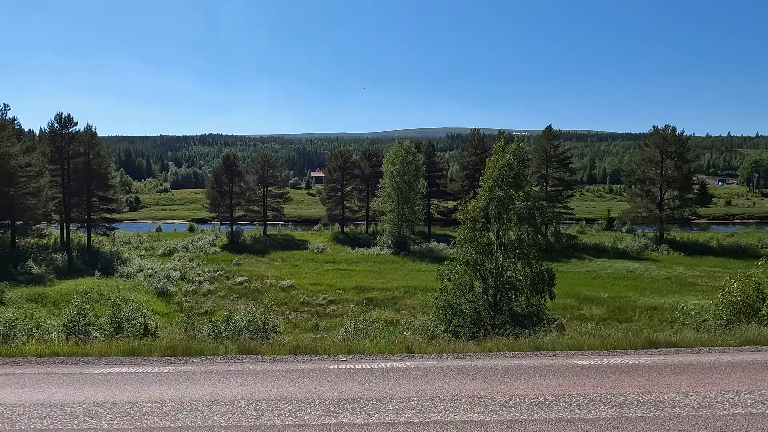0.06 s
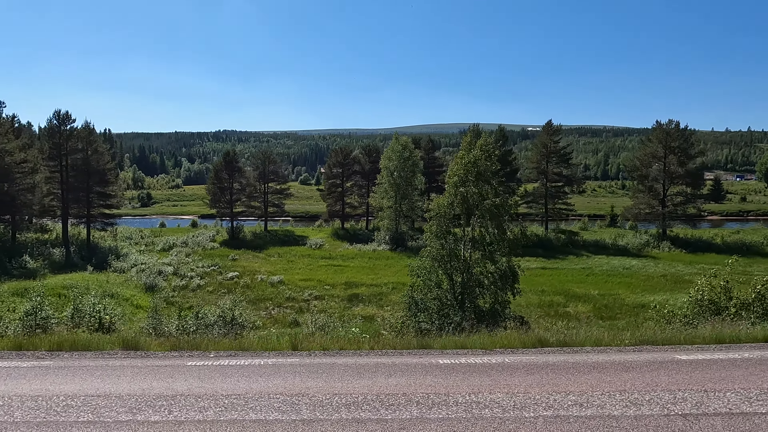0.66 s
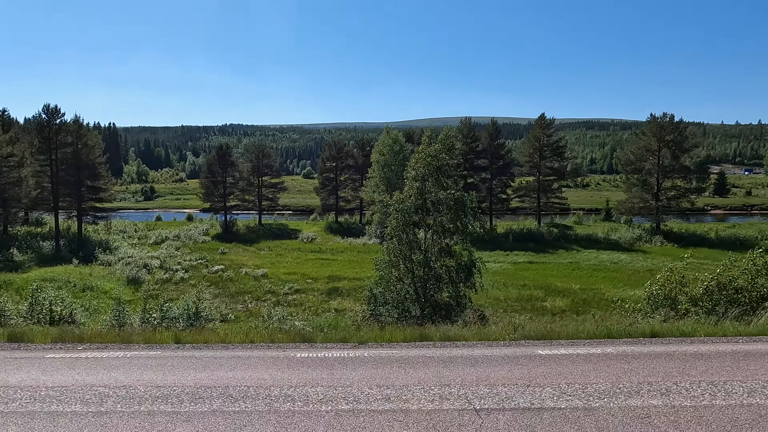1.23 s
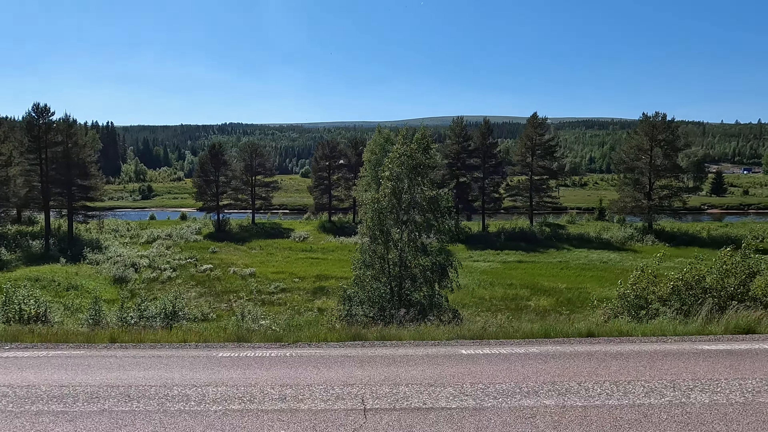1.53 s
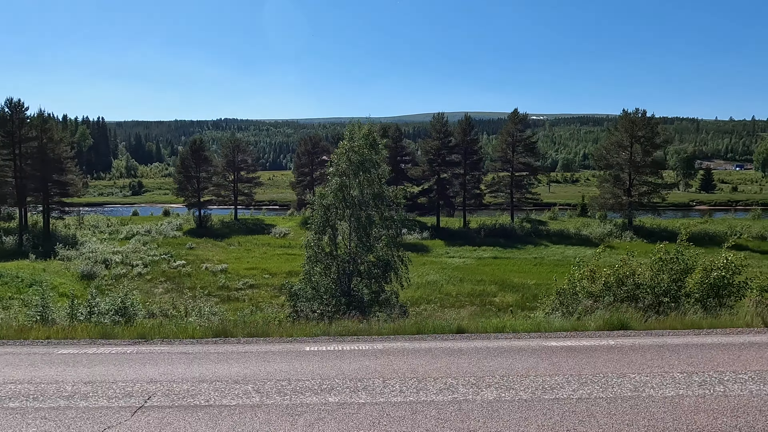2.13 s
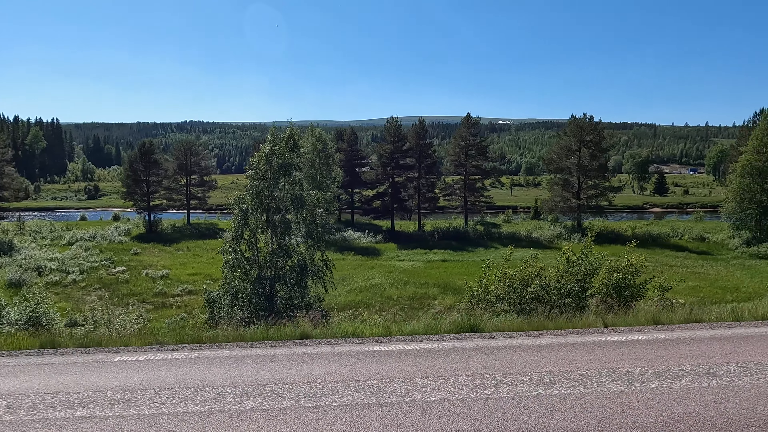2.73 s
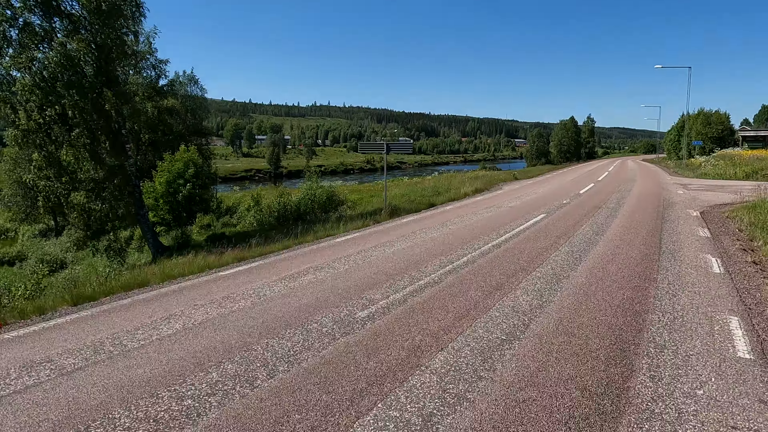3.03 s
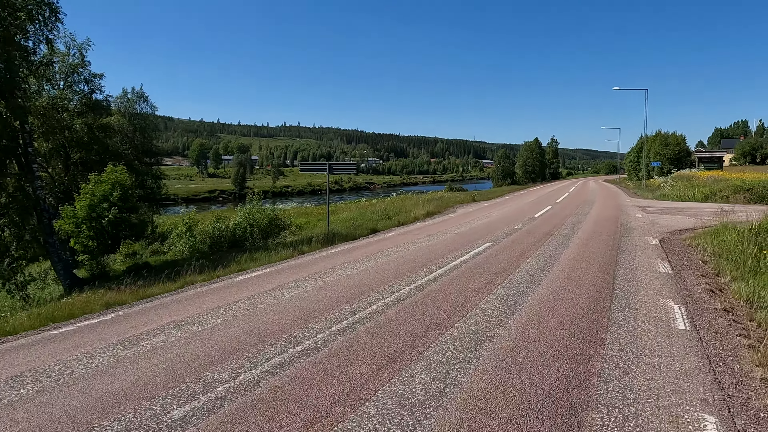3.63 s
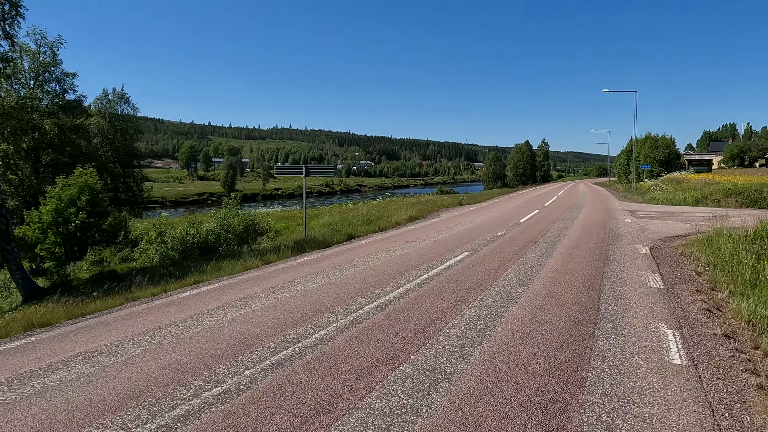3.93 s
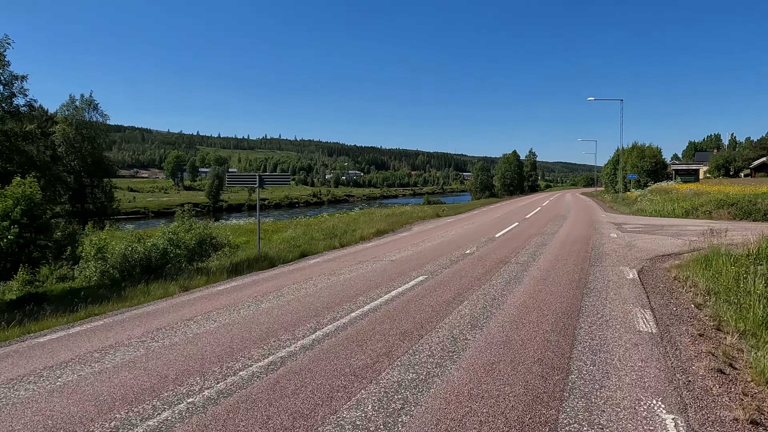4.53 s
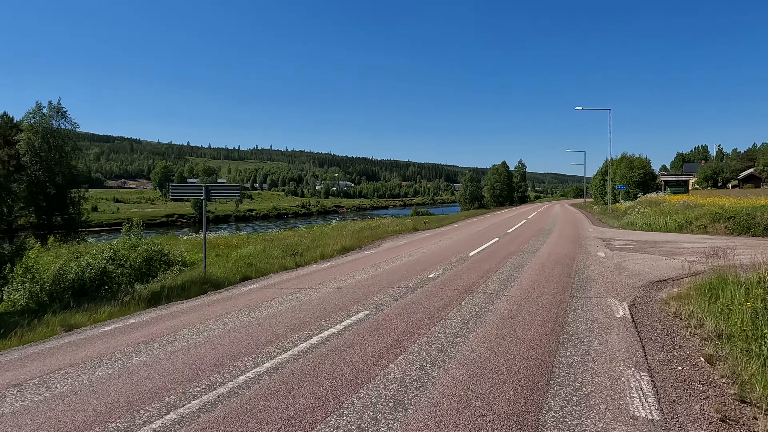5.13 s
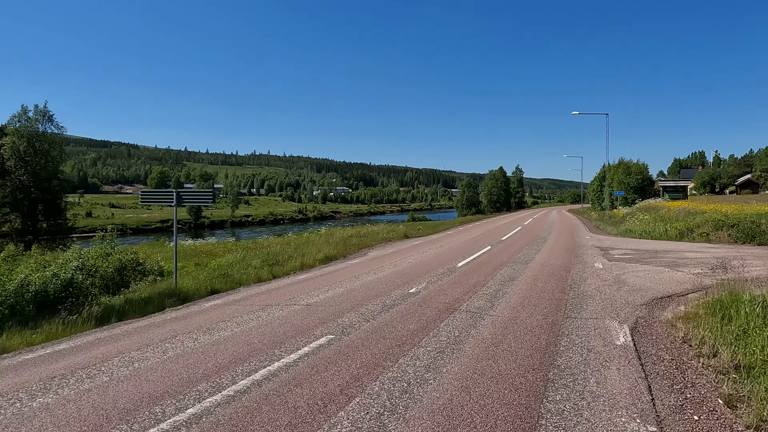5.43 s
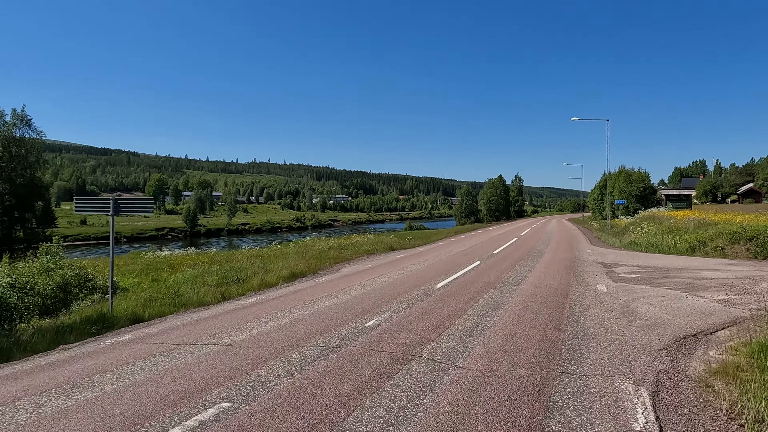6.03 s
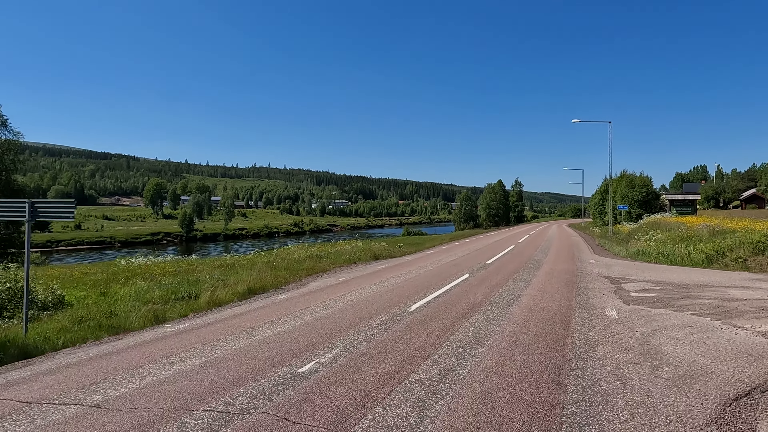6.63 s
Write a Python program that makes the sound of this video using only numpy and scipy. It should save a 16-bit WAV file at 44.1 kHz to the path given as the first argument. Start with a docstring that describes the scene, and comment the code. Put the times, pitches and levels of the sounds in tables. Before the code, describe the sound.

Beside a country road, a warbler whistles and trills while dry grass rustles and snaps, and a distant engine drone fades in. After about three seconds the sound cuts to a motorcycle close by, which revs, shifts up a gear and pulls away steadily over rushing tyres, hissing air and small ticks of grit. Gusts of wind bump the microphone with a low rumble throughout.

```python
"""A warbler whistles by a country road, grass rustles and an engine drones far off.
After three seconds the scene cuts to a motorcycle close by, which shifts up a gear and pulls away.
Its four cylinders fire into a ringing exhaust pipe, over the rush of tyres and air and ticks of grit.
All along, gusts of wind bump the microphone with a low rumble."""
import sys
import numpy as np
from scipy import signal
from scipy.fft import rfft, irfft
from scipy.io import wavfile
from scipy.ndimage import uniform_filter1d

SR = 44100
rng = np.random.default_rng(int(sys.argv[2]) if len(sys.argv) > 2 else 0)


def master_out(mix):
    """Clip the mix to full scale and print it as 16-bit PCM to the path in sys.argv[1]."""
    frames = np.transpose(np.atleast_2d(mix))
    ceiling = np.clip(frames, -1, 1)
    pcm = np.round(ceiling * 32767).astype(np.int16)
    wavfile.write(sys.argv[1], SR, pcm)


N = 302827
T = np.arange(N) / SR
CUT_S = 3.0633  # the roadside ends and the ride begins
SHIFT_S, BITE_S = 3.32, 3.75  # the throttle closes, then the clutch bites in the higher gear

# how far left the ride sounds: f/Hz, left minus right/dB
RIDE_PAN = [(110, 0), (200, 2), (380, 4.5), (700, 10), (1290, 16), (2380, 8), (4400, -0.5), (15000, 14.5)]
# how much earlier the ride reaches the left side: f/Hz, phase lead/rad
RIDE_LEAD = [(150, 0), (450, 0.35), (600, 1.1), (720, 3.2), (1100, 3.6), (2000, 3.2), (3100, 4.2),
             (3500, 1.6), (9000, 0.3)]
# how alike the two sides sound at the roadside: f/Hz, likeness (1 = the same)
ROADSIDE_LIKENESS = [(1400, 0.99), (3100, 0.85), (7000, 1), (15000, 0.065)]
# how far left the roadside sounds: f/Hz, left minus right/dB
ROADSIDE_PAN = [(400, 0.5), (2400, 2.5), (4400, -1), (8000, 4.5), (15000, 7)]


def motorcycle(puff=0.33, clatter=0.11):
    """The exhaust note and its rasp of gas, with tyres, machinery and air; firings puff and clatter."""
    # how hard the engine works: t/s, level/dB
    effort = [(3.1, -32), (3.58, -29), (3.74, -35.5), (4.7, -30.8), (4.95, -31.8), (5.12, -33.3),
              (6.0, -33.5), (6.1, -35.5), (6.75, -41)]
    # tone of the rushing exhaust gas: f/Hz, level/dB
    gas_tone = [(30, -17), (80, -4), (200, 0), (330, -5), (450, -6.5), (610, -8), (730, -10.5), (1000, -22)]
    effort_db, = curves(effort)
    cycle_hz = engine_speed()
    cycles = 0.168 + np.cumsum(cycle_hz * (T > CUT_S)) / SR
    firing = np.cos(2 * np.pi * 4 * cycles)  # four firings a cycle
    note = exhaust(cycle_hz, cycles, push_db=effort_db + 31.5)  # effort above a steady pull
    gas_db = effort_db + by_gear(low_db=0, high_db=2, arch_db=2, db_per_s=-0.7)
    gas = gain_of(gas_db) * (1 + puff * firing) * ride_rush(gas_tone, patchy_db=2.5)
    return note + gas + tyres() + (1 + clatter * firing) * machinery() + air_hiss()


def exhaust(cycle_hz, cycles, push_db, shake=0.04, smear=0.39, stagger=2.85):
    """Firings give every fourth harmonic, tones between add a throb; the pipe colours and delays them."""
    # the tones: multiple of the cycle rate, low-gear level/dB, high-gear level/dB
    tones = [(1, -1.5, -6.0), (2, 4.1, -7.5), (3, 4.5, -8.0), (4, 13.6, 7.5), (5, 5.2, 11.7),
             (6, -5.0, 3.6), (7, -4.5, -6.0), (8, 5.0, 9.3), (9, 6.2, -0.5), (10, 1.3, -1.5),
             (11, 1.0, 0.0), (12, -4.0, 1.0), (13, 2.4, -1.8), (14, -4.3, -2.5), (15, 2.9, -2.6),
             (16, -8.5, -11.2), (17, -7.2, -4.5), (18, 0.4, -9.5), (19, 6.7, -7.5), (20, 1.7, 2.0),
             (21, -1.1, 3.6), (22, -2.9, 2.3)]
    # what the pipe and silencer let through: f/Hz, level/dB
    pipe = [(30, -14.6), (80, -5.4), (105, -3.1), (120, -6.3), (135, -10.4), (150, -11.3), (165, -9.3),
            (180, -3.8), (210, -11.5), (230, -9.7), (250, -8.8), (275, -11.3), (300, -15.2), (325, -10.6),
            (350, -11.9), (375, -17.1), (410, -16.0), (450, -15.5), (490, -14.9), (530, -18.3),
            (620, -22.3), (700, -36.6), (950, -35.0)]
    firing_db = by_gear(low_db=-24, high_db=-24, arch_db=6, db_per_s=0)
    throb_db = by_gear(low_db=-24, high_db=-24, arch_db=-2.5, db_per_s=-0.15)
    engaged = shift_progress() ** 3  # the high gear takes hold late in the change
    grid_hz = np.fft.rfftfreq(8192, 1 / SR)
    log_gain = np.log(gain_of(read(pipe, grid_hz)))
    # the pipe's delay at each frequency follows from its gains
    pipe_lag = -signal.hilbert(np.r_[log_gain, log_gain[-2:0:-1]]).imag[:len(grid_hz)]
    out = np.zeros((2, N))
    for k, low_db, high_db in tones:
        hz = k * cycle_hz
        upper = np.clip((hz - 250) / 250, 0, 1)
        level_db = low_db + (high_db - low_db) * engaged + (throb_db if k % 4 else firing_db)
        level_db += read(pipe, hz)
        level_db += 0.9 * upper * push_db  # an open throttle sharpens the pulses
        level_db += (0.7 + 1.8 * upper) * waver(hz=2.0)  # upper harmonics waver more
        # a separate drone just below the fifth harmonic beats with the note, so the throb slowly changes
        multiple = k - 0.01 * (k == 5)
        phase = 2 * np.pi * multiple * cycles + np.interp(hz, grid_hz, pipe_lag)
        phase += smear * k ** 2  # the silencer's chambers spread each pulse
        phase += stagger * (k % 2)  # shifts the odd tones against the even ones
        pair = np.cos([phase, phase - read(RIDE_LEAD, hz)])
        out += np.sqrt(2) * gain_of(level_db) * pair * sides(read(RIDE_PAN, hz))
    return out * (1 + shake * waver(hz=61.4))  # no two firings are equally strong


def engine_speed(top_hz=40.6, bite_hz=27.92, low_hz_per_s=7.4, high_hz_per_s=2.27):
    """Four-stroke cycles a second: they climb, fall while the clutch is out, then climb more slowly."""
    fall = (bite_hz - top_hz) * shift_progress() ** 1.65
    climb = low_hz_per_s * np.minimum(T - SHIFT_S, 0) + high_hz_per_s * np.maximum(T - BITE_S, 0)
    return top_hz + fall + climb


def shift_progress():
    """How far the gear change has got, from 0 in the low gear to 1 in the high one."""
    return np.clip((T - SHIFT_S) / (BITE_S - SHIFT_S), 0, 1)


def by_gear(low_db, high_db, arch_db, db_per_s):
    """A level that moves from low gear to high, with a hump or dip on the way and a drift afterwards."""
    progress = shift_progress()
    arch = arch_db * np.sin(np.pi * progress) ** 2
    return low_db + (high_db - low_db) * progress + arch + db_per_s * np.maximum(T - BITE_S, 0)


def tyres():
    """The tread hums at a drifting pitch and rings faintly about an octave up; the road roars under it."""
    # tones of the tread's hum, its higher ring and the road's roar: f/Hz, level/dB
    hum_tone = [(600, -28.5), (820, -20), (915, 2), (1030, -1.5), (1170, -10), (1700, -26.5)]
    ring_tone = [(1600, -26.5), (1930, 0.5), (2200, -20), (3500, -49.5)]
    roar_tone = [(500, -18), (780, -1), (1000, -3.5), (1420, -4), (1680, -8.5), (2100, -21), (3000, -40)]
    # drift of the hum: t/s, ratio to its usual pitch
    hum_pitch = [(3.1, 1.025), (4.5, 1.04), (4.95, 1.06), (5.5, 1.0), (6.85, 0.96)]
    # strength of the ring: t/s, level/dB
    ring_level = [(4.4, -71), (4.97, -45), (5.36, -59.5), (6.14, -49.5), (6.6, -69)]
    steady_hum = ride_rush(hum_tone, patchy_db=-1)
    pitch_ratio, = curves(hum_pitch)
    position_s = np.cumsum(pitch_ratio * (T > CUT_S)) / SR + CUT_S / 2  # faster sounds higher
    hum = np.array([np.interp(position_s, T, side) for side in steady_hum])
    hum *= gain_of(by_surface(db=-37.5, follows=0.54, db_per_s=0.33))
    ring = gain_of(curves(ring_level)[0]) * ride_rush(ring_tone, patchy_db=-1.5)
    roar_db = by_surface(db=-38.8, follows=0.78, db_per_s=-0.75)
    return hum + ring + gain_of(roar_db) * ride_rush(roar_tone, patchy_db=2)


def by_surface(db, follows, db_per_s, usual_db=-34.5):
    """A slowly drifting level that swells as the road gets coarser."""
    # noise of the road surface: t/s, level/dB
    surface = [(3.1, -37.5), (3.62, -35), (3.95, -34), (4.53, -39), (4.92, -27), (5.45, -38.5),
               (5.9, -35.5), (6.2, -37), (6.55, -43), (6.66, -49.5)]
    surface_db, = curves(surface)
    return db + follows * (surface_db - usual_db) + db_per_s * (T - CUT_S)


def machinery():
    """Moving parts whirr and swell twice, first as the clutch bites."""
    # tone of the whirr: f/Hz, level/dB
    tone = [(1000, -7.5), (2250, -1), (3100, -0.5), (3800, -6.5), (4600, -12), (6000, -18), (9000, -49.5)]
    # its swells: peak t/s, half-length/s, boost/dB
    swells = [(3.718, .2, 3.0), (6.33, .13, 4.5)]
    level_db = by_surface(db=-49, follows=0.33, db_per_s=0.2)
    level_db += sum(db * np.exp(-((T - s) / half_s) ** 2) for s, half_s, db in swells)
    return gain_of(level_db) * ride_rush(tone, patchy_db=2)


def air_hiss():
    """Air hisses past the motorcycle and fades in the high gear."""
    # tone of the hiss: f/Hz, level/dB
    tone = [(1500, -25.5), (4800, -7), (7000, 0.5), (8500, -5), (10500, -11.5), (12500, -16.5),
            (16000, -23.5)]
    level_db = by_gear(low_db=-56.5, high_db=-63.5, arch_db=-1.5, db_per_s=-2.5)
    return gain_of(level_db) * ride_rush(tone, patchy_db=2.5, size=256)


def grit():
    """The tyres fling and scrape small stones."""
    # the stones: t/s, relative peak/dB, centre f/Hz, decay/s
    stones = [(4.5697, -45, 6500, .003), (4.7318, -42, 5100, .003), (4.7875, -39, 7250, .006),
              (4.92, -48, 8500, 0.034), (5.113, -37, 7300, .008), (5.1399, -40, 6510, .007),
              (5.269, -42, 8100, 0.027), (5.376, -38.5, 6780, 0.0039), (5.4661, -44, 4800, 0.0027),
              (5.571, -45, 7540, 0.0024), (5.67, -49, 7010, 0.033), (5.703, -45, 7500, 0.0043),
              (5.98, -51.5, 7500, 0.03), (6.36, -55, 9420, 0.065), (6.5202, -42, 4784, .003),
              (6.5423, -41, 5200, 0.0054), (6.6, -54, 8300, 0.043), (6.6923, -41, 5400, .003),
              (6.7585, -41, 5340, 0.016), (6.832, -38, 6650, 0.0029)]
    return ticks(stones, db=-3, octaves=0.35, scatter_db=11.5)


def warbler(db=-0.8, db_per_octave=17, flutter_db=2.6, echo_db=-13, echo_s=0.035):
    """Whistles and a trill, at times two at once from the two sides of the voice box; trees echo them."""
    # the notes: start t/s, length/s, opening f/Hz, middle f/Hz, closing f/Hz, relative level/dB
    notes = [(0.023, 0.11, 2020, 2600, 3480, -37), (0.198, 0.018, 3500, 4200, 4830, -47),
             (0.455, 0.023, 1930, 2120, 2250, -44), (0.498, 0.031, 2290, 2090, 1900, -50),
             (0.58, 0.045, 4300, 5750, 4940, -56), (0.604, 0.031, 3600, 4000, 4730, -45),
             (0.642, 0.031, 4300, 3320, 3770, -40), (0.67, 0.086, 2680, 2903, 2870, -33),
             (0.789, 0.044, 2790, 2340, 1960, -41.5), (0.888, 0.032, 2040, 3030, 3140, -36.5),
             (0.968, 0.077, 3000, 2330, 2010, -43), (0.929, 0.056, 3300, 3170, 3380, -48),
             (0.986, 0.054, 3660, 3600, 3900, -54), (1.103, 0.026, 1990, 2270, 2100, -45),
             (1.147, 0.019, 1990, 2280, 2050, -42.5), (1.177, 0.088, 2066, 1900, 1580, -46.5),
             (1.335, 0.061, 5740, 5470, 5650, -44.5), (1.346, 0.045, 2780, 2610, 2250, -45),
             (1.36, 0.012, 3800, 3970, 4700, -41), (1.395, 0.021, 5540, 3830, 4040, -42),
             (2.116, 0.0053, 5400, 5100, 4900, -45), (2.688, 0.025, 4330, 4240, 4200, -56)]
    trill = [(0.283 + k * 0.0125, 0.021, 2750, 3480, 3900, -42) for k in range(6)]  # same columns
    song = np.zeros(N)
    unsteady, flutter = waver(hz=402), gain_of(flutter_db * waver(hz=70))
    for s, length_s, open_hz, middle_hz, close_hz, level_db in notes + trill:
        t = np.arange(0, length_s, 1 / SR)
        progress = t / length_s
        arch_hz = (middle_hz - (open_hz + close_hz) / 2) * (1 - (2 * progress - 1) ** 2)
        hz = open_hz + (close_hz - open_hz) * progress + arch_hz
        effort_db = level_db + db_per_octave * np.log2(hz / middle_hz)  # higher is louder
        burr = np.interp(effort_db, [-41, -32], [0.034, 0.005])  # soft notes scratch, loud ones are pure
        pitch_hz = hz * (1 + burr * np.interp(s + t, T, unsteady))
        whistle = np.sqrt(2) * np.sin(2 * np.pi * np.cumsum(pitch_hz) / SR)
        envelope = signal.windows.tukey(len(t), 0.3) * np.interp(s + t, T, flutter)
        add(song, s, gain_of(effort_db + db) * envelope * whistle)
    trees = rng.standard_normal((2, SR // 2)) * np.exp(-T[:SR // 2] / echo_s)
    echo = signal.fftconvolve(song[None], trees / np.linalg.norm(trees[0]), axes=1)[:, :N]
    return song * sides(pan_db=2.5)[:, None] + gain_of(echo_db) * echo


def grass(db=3, stir_db=-51.5, grain_db=2, attack_s=0.0041, release_s=0.055):
    """Dry blades stir and brush together in grainy clumps; stalks crackle and snap."""
    # tone of the rustle: f/Hz, level/dB
    tone = [(250, -3), (400, 13), (750, 9), (2200, -0.5), (4400, -2.5), (7000, -8.5), (8300, -14.5),
            (10500, -19), (12500, -20.5), (15500, -19)]
    # blades brushing: start t/s, length/s, relative level/dB
    brushes = [(0.142, 0.076, -41.5), (0.316, 0.033, -42), (0.418, .025, -44), (0.567, 0.11, -45.5),
               (0.921, 0.012, -40), (0.98, 0.16, -48), (1.135, 0.033, -41.5), (1.23, 0.019, -43.5),
               (1.306, 0.071, -45), (1.401, 0.056, -44.5), (1.803, 0.047, -46), (1.916, 0.021, -48),
               (2.137, 0.036, -49.5), (2.285, 0.041, -49.5), (2.75, 0.044, -45.5), (2.945, 0.13, -50)]
    # stalks snapping: t/s, relative peak/dB, centre f/Hz, decay/s
    snaps = [(.068, -35.5, 7840, 0.015), (.1605, -27, 1090, 0.0044), (.163, -28, 4080, 0.046),
             (.4276, -40, 3570, 0.007), (.45, -27, 900, 0.0024), (.579, -44, 5000, 0.0057),
             (.7375, -16.5, 1180, 0.0014), (.929, -31.5, 6170, 0.004), (1.14, -21.5, 1290, 0.0039),
             (1.2548, -30.5, 3900, 0.0073), (1.42, -35, 7500, .012), (1.835, -38, 6800, .012),
             (1.8876, -37, 5000, .003), (1.94, -43, 6500, .005), (2.141, -26, 1900, 0.0025),
             (2.163, -35, 3470, .002), (2.183, -43, 4200, .003), (2.24, -35, 4250, .004),
             (2.306, -34, 3750, 0.0089), (2.36, -37, 4296, .003), (2.418, -38, 4480, .01),
             (2.502, -37, 4280, .004), (2.557, -38, 4500, .005), (2.693, -43, 4250, .005),
             (2.787, -16.5, 1390, 0.002), (2.963, -40, 4240, .008), (3.05, -34, 4270, .005)]
    power = gain_of(stir_db) ** 2
    for s, length_s, brush_db in brushes:
        rise = np.clip((T - s) / attack_s, 0, 1)
        fall = np.exp(-np.maximum(T - s - length_s, 0) / release_s)
        power = power + (gain_of(brush_db) * rise * fall) ** 2
    grains = evened(gain_of(grain_db * waver(hz=162)))
    noise = rush(tone, ROADSIDE_LIKENESS, ROADSIDE_PAN, patchy_db=2.5, size=256)
    rustle = gain_of(db) * np.sqrt(power) * grains * noise
    return rustle + ticks(snaps, db=-2, octaves=0.64, scatter_db=3.5, widen=0.3)


def wind(db=-1.5, breeze_db=-39, likeness=0.84, pan_db=-3):
    """Gusts swell out of a light breeze; their swirls buffet the microphone with a low rumble."""
    # the gusts: peak t/s, length/s, relative level/dB
    gusts = [(0.354, 0.38, -25), (0.708, 0.1, -24), (0.976, 0.081, -18), (1.102, 0.1, -21),
             (1.328, 0.12, -17), (1.59, 0.065, -15), (1.8, 0.61, -27.5), (2.39, 0.11, -20.5),
             (2.647, 0.5, -29.5), (3.964, 0.028, -19), (4.2, 1.1, -42), (4.95, 0.26, -24),
             (5.167, 0.23, -16.5), (5.39, 0.042, -10), (5.547, 0.23, -18), (5.89, 0.22, -20),
             (6.214, 0.089, -16), (6.762, 0.16, -38)]
    # tone of the rumble: f/Hz, level/dB
    tone = [(4, -20.5), (16, -2.5), (32, -10), (55, -10.5), (85, -14.5), (130, -31), (250, -51), (600, -61)]
    power = gain_of(breeze_db) ** 2
    for s, length_s, gust_db in gusts:
        power = power + gain_of(gust_db) ** 2 * 0.5 ** ((2 * (T - s) / length_s) ** 2)
    swirls = rush(tone, [(30, likeness)], [(30, pan_db)], patchy_db=-3.5, size=4096)
    swirls /= np.sqrt(uniform_filter1d(swirls.mean(0) ** 2, size=5000))  # flatten their chance swells
    return gain_of(db) * np.sqrt(power) * swirls


def distant_engine(waver_db=3):
    """A far engine drones on one low, wavering note that fades in."""
    # the drone: t/s, f/Hz, level/dB
    drone = [(1.5, 89, -68), (1.9, 85.3, -40), (2.3, 80.66, -35), (3.06, 83.1, -33.5)]
    hz, level_db = curves(drone)
    level_db += waver_db * waver(hz=3.9)
    return np.sqrt(2) * gain_of(level_db) * np.sin(2 * np.pi * np.cumsum(hz) / SR)


def valley(db=-32):
    """A far road and river blend into a soft wash."""
    # tone of the wash: f/Hz, level/dB
    tone = [(50, -32), (100, 1.5), (140, -4), (205, 0), (290, -10.5), (360, -8), (425, -4.5), (590, -19),
            (750, -27.5), (970, -15.5), (1300, -20), (1920, -30.5), (6500, -50.5), (15000, -80)]
    return gain_of(db) * rush(tone, ROADSIDE_LIKENESS, ROADSIDE_PAN, patchy_db=0.65)


def ticks(rows, db, octaves, scatter_db, widen=0.0, rise_s=0.00041, clump_db=3):
    """Gritty bursts scattered left and right: ticks when short, scrapes when long."""
    t, hz = T[:8192], np.fft.rfftfreq(8192, 1 / SR)
    out = np.zeros((2, N))
    for s, peak_db, centre_hz, decay_s in rows:
        width = octaves * gain_of(widen * (peak_db + 37.5))  # widen gives hard snaps a broader band
        colour = np.exp(-(np.log2((hz + 1) / centre_hz) / width) ** 2)
        clumps = evened(uniform_filter1d(rng.standard_normal(len(t)), size=80))
        grains = rng.laplace(size=len(t)) * gain_of(clump_db * clumps)
        burst = irfft(rfft(grains) * colour) * np.exp(-t / decay_s) * np.minimum(t / rise_s, 1)
        burst *= gain_of(peak_db + db) / abs(burst).max()
        add(out, s, burst * sides(scatter_db * rng.standard_normal())[:, None])
    return out


def ride_rush(tone, patchy_db, size=1024):
    """Rushing noise that comes from where the motorcycle is."""
    # how alike the two sides sound: f/Hz, likeness (1 = the same)
    likeness = [(300, 1.0), (600, 0.9), (820, 0.78), (1100, 0.58), (1450, 0.2), (2200, 0.62), (3800, 0.6),
                (4600, 0.22)]
    return rush(tone, likeness, RIDE_PAN, patchy_db, size, lead=RIDE_LEAD)


def rush(tone, likeness, pan, patchy_db, size=1024, lead=None):
    """Stereo noise of a given tone with drifting loud and soft patches; the sides' average has rms 1."""
    hz = np.fft.rfftfreq(size, 1 / SR)
    a, b, c, d, patches = rng.standard_normal((5, N * 4 // size + 5, len(hz)))
    patches = evened(uniform_filter1d(uniform_filter1d(patches, size=8, axis=0), size=12, axis=1))
    alike = np.clip(read(likeness, hz), -1, 1)
    left = a + 1j * b
    right = alike * left + np.sqrt(1 - alike ** 2) * (c + 1j * d)
    if lead:
        right *= np.exp(-1j * read(lead, hz))  # the right side hears it later
    spectra = np.array([left, right]) * sides(read(pan, hz))[:, None]
    spectra *= gain_of(read(tone, hz) + patchy_db * patches)
    spectra /= 1 + (hz / tone[-1][0]) ** 4  # dies away above the tone's last point
    noise = signal.istft(spectra.transpose(0, 2, 1), nperseg=size, noverlap=size - size // 4)[1][:, :N]
    return noise / noise.mean(0).std()


def waver(hz):
    """A smooth random wobble of rms 1, with up to about hz changes a second."""
    smoothing = np.exp(-(np.fft.rfftfreq(N, 1 / SR) / hz) ** 2)
    return evened(irfft(rfft(rng.standard_normal(N)) * smoothing, N))


def sides(pan_db):
    """Left and right gains whose average is 1."""
    pair = gain_of(np.array([pan_db, -pan_db]) / 2)
    return pair / pair.mean(0)


def gain_of(db):
    """Turns decibels into a multiplier."""
    return 10 ** (np.asarray(db) / 20)


def evened(x):
    """Scales a signal so that its typical size (rms) is 1."""
    return x / np.sqrt(np.mean(x ** 2) + 1e-20)


def read(points, hz):
    """Looks up hz in a frequency table, joining its points on a log scale."""
    f, value = np.transpose(points)
    return np.interp(np.log(hz + 1), np.log(f + 1), value)


def curves(rows):
    """Turns each column of a time table into one value a sample."""
    s, *columns = np.transpose(rows)
    return [np.interp(T, s, column) for column in columns]


def add(mix, s, sound):
    """Mixes a sound in at s seconds."""
    part = mix[..., max(round(s * SR), 0):][..., :sound.shape[-1]]
    part += sound[..., :part.shape[-1]]


def scene():
    """The roadside up to the cut, the ride after it, wind throughout."""
    roadside = distant_engine() + valley() + grass() + warbler()
    ride = motorcycle() + grit()
    ride *= 1 - 0.45 * np.exp(-abs(T - CUT_S) / 0.003)  # opens about half as strong and recovers within a few milliseconds
    return np.where(T < CUT_S, roadside, ride) + wind()


def record(dry, edge_hz=15900):
    """Removes the highest treble."""
    low_pass = signal.firwin(511, edge_hz, window=("kaiser", 9), fs=SR)
    return signal.oaconvolve(dry, low_pass[None], "same")


dry = scene()
out = record(dry)
master_out(out)
```